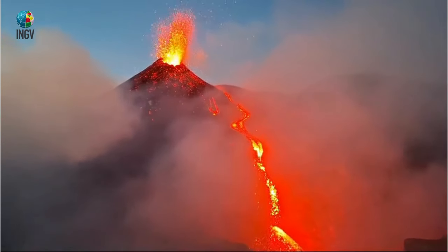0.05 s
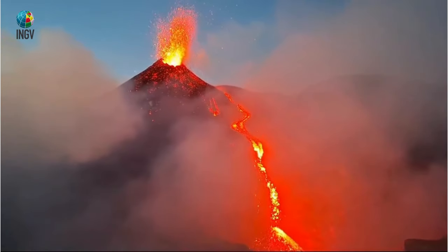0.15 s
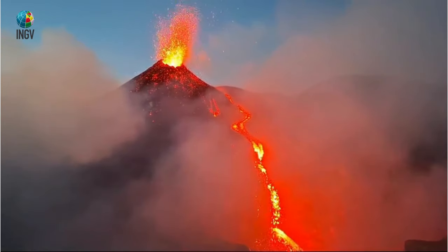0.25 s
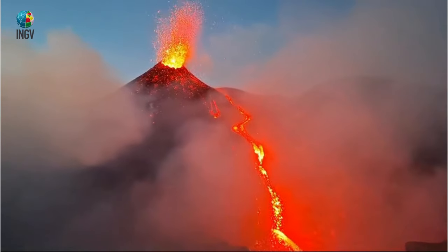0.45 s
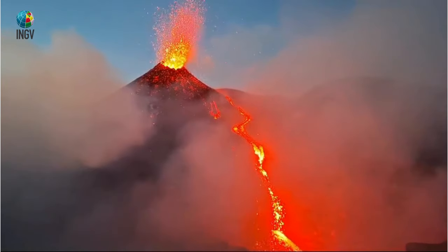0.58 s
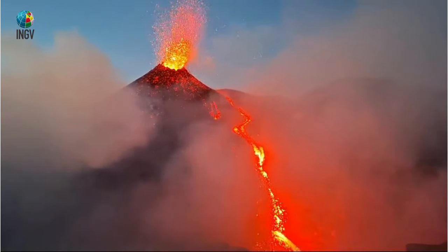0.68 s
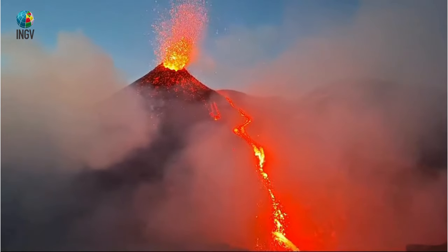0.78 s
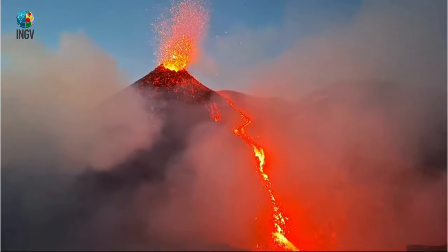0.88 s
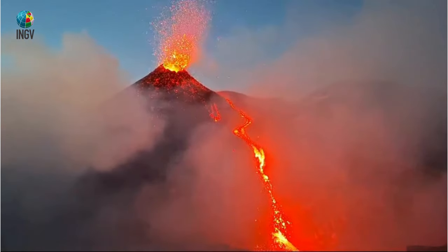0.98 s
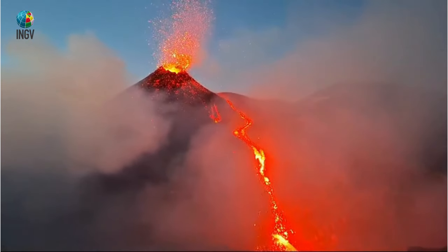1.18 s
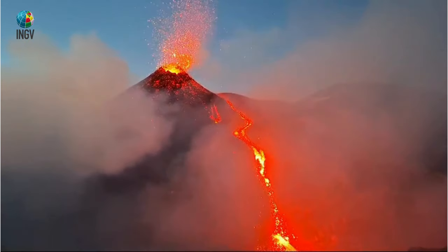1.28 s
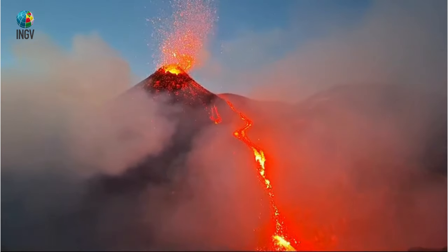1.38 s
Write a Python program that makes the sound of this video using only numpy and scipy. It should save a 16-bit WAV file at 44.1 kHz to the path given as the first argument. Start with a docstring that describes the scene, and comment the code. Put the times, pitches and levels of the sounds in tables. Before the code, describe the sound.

A short erupting volcano's roar surges with dull booms, then dies away under gusting wind.

```python
"""Distant volcano: a lava fountain surges. A gas jet roars up quickly and dies away, with
dull claps, spurts of hiss and the vent's hollow note, over low booms of bursting gas bubbles.
Wind buffets the right microphone port and shakes something loose that knocks softly near the left.
A faint high sizzle passes in sprays while the roar fades."""
import sys
import numpy as np
from scipy import signal
from scipy.fft import rfft, irfft
from scipy.io import wavfile
from scipy.ndimage import uniform_filter1d

SR = 44100
rng = np.random.default_rng(int(sys.argv[2]) if len(sys.argv) > 2 else 0)


def wrap_up_sound(samples):
    """Save the sound to the file named by the first command line argument, as 16-bit audio."""
    columns = np.atleast_2d(samples).T
    # keep every value between -1 and 1, then stretch to whole-number steps
    tamed = np.clip(columns, -1, 1)
    steps = np.round(tamed * 32767).astype(np.int16)
    wavfile.write(sys.argv[1], SR, steps)


N = 63945

# wind at the ports (time [s], left [dB], right [dB])
BUFFETING = [(0, -41.5, -29), (.12, -58, -38.5), (.3, -57.5, -30), (0.599, -36, -28.5), (.77, -43, -36),
             (.95, -38.5, -32.5), (1.06, -56.5, -41), (1.142, -40, -34), (1.25, -74, -35.5),
             (1.45, -41.5, -35.5)]
# wind spectra (frequency [Hz], density [dB])
LEFT_WIND_SPECTRUM = [(20, -15.5), (70, -4), (150, -15), (220, 5.5), (330, -9), (600, -24.5), (5000, -92.5)]
RIGHT_WIND_SPECTRUM = [(15, -24.5), (35, -6), (70, 3.5), (125, 1.5), (210, -5), (300, -14), (480, -21.5),
                       (700, -43), (2000, -35.5), (6000, -100)]
# gusts on the right port (time [s], half-width [s], level [dB], pitch [Hz])
GUSTS = [(.04, .016, -25.5, 110), (.214, .027, -25, 58), (.325, .013, -19, 195), (1.125, .02, -34, 84),
         (1.186, .02, -26, 180), (1.3, .016, -33, 200), (1.368, .028, -25, 105), (1.405, .012, -29, 230),
         (1.423, .018, -28, 90)]
# eddies in a gust (frequency [x pitch], density [dB])
EDDY_SPECTRUM = [(.2, -14), (.7, -1.5), (2.6, -5.5), (4, -26), (30, -82.5)]

# gas jet; steady roar, swollen by the surge rolling over the slopes (time [s], level [dB])
JET_LEVEL = [(0, -78), (.19, -53), (.222, -33.5), (.25, -29.5), (.283, -24), (.355, -20.5), (.395, -21.5),
             (.452, -27.5), (.53, -27.5), (.635, -30.5), (.68, -40.5), (.8, -37), (.92, -44), (1.05, -55),
             (1.45, -62)]
WASH_LEVEL = [(0, -48.5), (.2, -50.5), (.245, -29), (.3, -22.5), (.36, -35.5), (.47, -38.5), (.65, -33),
              (.72, -36), (.83, -37), (.91, -41.5), (.96, -41), (1.08, -47), (1.45, -48)]
# their spectra (frequency [Hz], density [dB])
JET_SPECTRUM = [(100, -26), (270, -14.5), (370, -1.5), (480, 0), (610, -9.5), (760, -2), (900, -14.5),
                (1080, -0.5), (1240, -7), (1420, -14), (1600, -22.5), (1760, -8), (2030, -29.5),
                (2230, -18.5), (2520, -35), (2900, -39), (3700, -40), (5000, -49), (7000, -61),
                (10000, -90)]
WASH_SPECTRUM = [(100, -14), (240, -12.5), (420, 2.5), (640, -2.5), (850, -2.5), (970, -3.5), (1250, -3),
                 (1500, -3), (1780, -5), (2030, -9.5), (2230, -12.5), (2500, -22.5), (2900, -32.5),
                 (3700, -29.5), (5000, -36), (7000, -65.5), (10000, -87)]
# jet, left to right (frequency [Hz], correlation [0..1])
JET_CORRELATION = [(200, 0.51), (400, 0.94), (1100, 1), (1800, 0.87), (3000, 0.27)]
# vent resonance (time [s], level [dB], pitch [Hz])
VENT_NOTE = [(0, -60, 450), (.29, -45, 420), (.46, -34, 375), (.51, -34, 440), (.63, -45, 420),
             (.72, -36.5, 460), (.82, -34.5, 440), (.9, -46, 420), (.955, -36.5, 445), (1.03, -48, 470),
             (1.45, -54, 430)]

# hiss and sizzle spectra (frequency [Hz], density [dB])
HISS_SPECTRUM = [(1500, -2.5), (2600, -3), (3700, -4.5), (4800, -9.5), (5800, -22.5), (8500, -28.5),
                 (13000, -25.5), (16000, -27.5)]
SIZZLE_SPECTRUM = [(4000, -22.5), (6500, -8), (8500, -17), (10500, -13.5), (12200, -6), (14000, -17.5),
                   (16000, -21.5)]
# sprays of sizzle (time [s], half-width [s], level [dB])
SPRAYS = [(0.074, 0.25, -80), (.089, 0.0027, -72), (0.376, .09, -81), (0.512, 0.046, -77),
          (0.585, 0.042, -73.5), (0.654, 0.054, -75.5), (0.753, 0.091, -78), (0.844, 0.053, -71.5),
          (0.913, 0.039, -73), (.985, 0.058, -77)]

# blows of the loose object (time [s], level [dB])
KNOCKS = [(.12, -30), (.181, -31), (1.173, -31), (1.189, -28), (1.201, -20.5), (1.248, -28.5), (1.267, -30),
          (1.29, -27), (1.302, -33), (1.339, -28), (1.374, -26.5), (1.406, -28), (1.42, -31)]
# its modes (frequency [Hz], level [dB], T60 [s])
KNOCK_MODES = [(323, -10.5, 0.026), (410.6, 1.5, 0.046), (473, 1, 0.028), (630, -5, 0.0091)]
# its contact tick (frequency [Hz], density [dB])
TICK_SPECTRUM = [(200, -6), (500, 7.5), (800, -7.5), (1400, -9), (2200, -25), (3000, -32), (5000, -49),
                 (9000, -69)]

# bubble bursts (time [s], half-width [s], level [dB], pitch [Hz], left minus right [dB])
BOOMS = [(.279, .02, -21.5, 72, -5), (.329, .023, -13.5, 76, -4), (.36, .012, -29, 150, 2),
         (.393, .024, -12, 74, 1), (.441, .022, -13.5, 68, 3), (.521, .025, -22.5, 70, 2),
         (.592, .025, -26.5, 85, -3), (.638, .02, -28, 130, 1), (.663, .026, -22.5, 60, 3),
         (.702, .018, -28, 85, 1), (.733, .022, -32, 55, 4), (.812, .024, -25, 72, 3),
         (.869, .022, -27, 115, 6)]
# their rumble (frequency [Hz], density [dB])
RUMBLE_SPECTRUM = [(15, -31), (35, 6.5), (90, -4.5), (180, 1.5), (270, -13), (500, -23.5), (1500, -71.5),
                   (5000, -110)]

# claps in the roar (time [s], half-width [s], level [dB])
CLAPS = [(.286, .008, -21.5), (.32, .014, -22), (.399, .016, -18.5), (.958, .011, -35)]
# spurts at the vent (time [s], rise [s], fall [s], level [dB])
SPURTS = [(0.299, 0.037, 0.037, -48.5), (0.618, 0.02, 0.077, -49.5)]
# their spectra (frequency [Hz], density [dB])
CLAP_SPECTRUM = [(120, 5), (300, -17.5), (470, 4.5), (700, -13), (1150, -7.5), (2000, -20.5), (2800, -36),
                 (8000, -97.5)]
SPURT_SPECTRUM = [(1200, -21.5), (2200, 6.5), (3000, -2.5), (3900, -1.5), (5000, -27.5), (7000, -43)]

TIME_S = np.arange(N) / SR
BINS_HZ = np.fft.rfftfreq(N, 1 / SR)


def amp(db):
    """Decibels to gain."""
    return 10 ** (np.asarray(db) / 20)


def unit(x):
    """Scale to rms 1."""
    return x / np.sqrt(np.mean(x ** 2) + 1e-20)


def level(points):
    """Gain along (time [s], level [dB])."""
    return amp(np.interp(TIME_S, *np.transpose(points)))


def per_bin(points):
    """Table value at each bin, on a log-frequency axis."""
    hz, value = np.transpose(points)
    return np.interp(np.log(BINS_HZ + 1), np.log(hz + 1), value)


def coloured(x, spectrum):
    """Filter by a spectrum; rms 1."""
    return unit(irfft(rfft(x) * amp(per_bin(spectrum)), N))


def pan(db):
    """Channel gains for a left-minus-right level."""
    return amp([[db / 2], [-db / 2]])


def stereo_noise(spread):
    """Common white noise plus an independent part per channel."""
    return rng.standard_normal(N) + spread * rng.standard_normal((2, N))


def flutter(rate_hz, depth_db):
    """Random gain wandering near rate_hz."""
    band = (BINS_HZ / rate_hz) / (1 + (BINS_HZ / rate_hz) ** 4)
    return amp(depth_db * unit(irfft(rfft(rng.standard_normal(N)) * band, N)))


def steady(x, samples=2205):
    """Flatten the slow swells of a noise."""
    power = uniform_filter1d(uniform_filter1d(x ** 2, samples), samples)
    return x / np.sqrt(abs(power) + 1e-12)


def swell(at_s, width_s):
    """Bell envelope, 1/e^2 at width_s from the centre."""
    return np.exp(-2 * ((TIME_S - at_s) / width_s) ** 2)


def lump(at_s, width_s, hz, start_turns, sag=0.2):
    """Pressure wave whose pitch sags through hz at at_s."""
    pitch_hz = hz * (1 - sag * np.tanh((TIME_S - at_s) / width_s))
    return np.sin(2 * np.pi * (start_turns + np.cumsum(pitch_hz) / SR))


def wind():
    """Buffeting, independent at each port; stronger on the right, where the gusts land."""
    air = rng.standard_normal((2, N)) * flutter(rate_hz=56, depth_db=1.5)
    left = level([(s, db) for s, db, _ in BUFFETING])
    left *= steady(coloured(air[0], LEFT_WIND_SPECTRUM))
    right = level([(s, db) for s, _, db in BUFFETING])
    right *= steady(coloured(air[1], RIGHT_WIND_SPECTRUM), samples=882)
    for (at_s, width_s, db, hz), start_turns in zip(GUSTS, rng.random(len(GUSTS))):
        spectrum = [(ratio * hz, eddy_db) for ratio, eddy_db in EDDY_SPECTRUM]
        eddies = steady(coloured(rng.standard_normal(N), spectrum), samples=441)
        right += amp(db) * swell(at_s, width_s) * (lump(at_s, width_s, hz, start_turns) + 0.55 * eddies)
    return np.array([left, right])


def turbulence(spectrum, correlation, depth_db, lag_s=0.00008):
    """Fluttering gas noise; reaches the right port lag_s late."""
    left, other = rfft(rng.standard_normal((2, N)) * flutter(rate_hz=72, depth_db=depth_db))
    right = correlation * left + np.sqrt(1 - correlation ** 2) * other
    right *= np.exp(-2j * np.pi * BINS_HZ * lag_s)
    return coloured(irfft(np.array([left, right]), N), spectrum)


def roar(jet_db=-1.5):
    """Throaty gas jet, surrounding wash and vent note, dulled by distance."""
    jet = level(JET_LEVEL) * turbulence(JET_SPECTRUM, per_bin(JET_CORRELATION), depth_db=1.0)
    wash = level(WASH_LEVEL) * turbulence(WASH_SPECTRUM, correlation=0.84, depth_db=1.9)
    return pan(db=0.86) * (amp(jet_db) * jet + wash + vent())


def vent(width_hz=38):
    """Narrow noise band following the vent's drifting resonance."""
    at_s, db, hz = np.transpose(VENT_NOTE)
    lowpass = 1 / (1 + 1j * np.fft.fftfreq(N, 1 / SR) / width_hz) ** 2
    noise = rng.standard_normal(N) + 1j * rng.standard_normal(N)
    drift = np.fft.ifft(np.fft.fft(noise) * lowpass)
    turns = np.cumsum(np.interp(TIME_S, at_s, hz)) / SR
    note = (drift * np.exp(2j * np.pi * turns)).real
    return amp(np.interp(TIME_S, at_s, db)) * steady(note, samples=1323)


def hiss():
    """Faint steady hiss plus sprays of grainy high sizzle."""
    floor = amp(db=-62.5) * pan(db=2.5) * coloured(rng.standard_normal((2, N)), HISS_SPECTRUM)
    grains = stereo_noise(spread=0.32) * flutter(rate_hz=110, depth_db=1.3)
    sprays = sum(amp(db) * swell(at_s, width_s) for at_s, width_s, db in SPRAYS)
    return floor + sprays * pan(db=-2) * coloured(grains, SIZZLE_SPECTRUM)


def knocks(rise_s=0.0024, tick_s=0.0029, tick_db=-9, right_db=-35):
    """Light blows: a tick and dull modes, randomly detuned per blow."""
    out = np.zeros(N)
    tick = amp(tick_db) * steady(coloured(rng.standard_normal(N), TICK_SPECTRUM), samples=130)
    for at_s, db in KNOCKS:
        age_s = np.maximum(TIME_S - at_s, 0)
        detunes = 1 + 0.04 * rng.standard_normal(len(KNOCK_MODES))
        ring = sum(amp(mode_db - 60 * age_s / t60_s) * np.sin(2 * np.pi * hz * detune * age_s)
                   for (hz, mode_db, t60_s), detune in zip(KNOCK_MODES, detunes))
        attack = 1 - np.exp(-age_s / rise_s)
        out += amp(db) * (attack * ring + swell(at_s + tick_s, tick_s) * tick)
    return np.array([out, amp(right_db) * out])


def booms():
    """Bursting gas bubbles: each a pressure lump in a puff of rumble."""
    out = np.zeros((2, N))
    rumble = steady(coloured(stereo_noise(spread=0.61), RUMBLE_SPECTRUM), samples=882)
    for (at_s, width_s, db, hz, pan_db), start_turns in zip(BOOMS, rng.random(len(BOOMS))):
        burst = 0.78 * lump(at_s, width_s, hz, start_turns) + 0.35 * rumble
        out += amp(db) * pan(pan_db) * swell(at_s, width_s) * burst
    return out


def claps():
    """Short dull noise bursts in the roar."""
    air = steady(coloured(stereo_noise(spread=0.12), CLAP_SPECTRUM), samples=330)
    return air * sum(amp(db) * swell(at_s, width_s) for at_s, width_s, db in CLAPS)


def spurts():
    """Brighter gas jets: quick rise, exponential tail."""
    envelope = np.zeros(N)
    for at_s, rise_s, fall_s, db in SPURTS:
        age_s = TIME_S - at_s
        rise = np.exp(-(age_s / rise_s) ** 2)
        fall = np.exp(-abs(age_s) / fall_s)
        envelope += amp(db) * np.where(age_s < 0, rise, fall)
    return envelope * coloured(stereo_noise(spread=0.72), SPURT_SPECTRUM)


def scene():
    """Eruption far off, wind close by."""
    return roar() + spurts() + claps() + booms() + wind() + knocks() + hiss()


def record(dry):
    """Steep low-pass band limit."""
    cutoff_hz = 15750
    lowpass = signal.firwin(511, cutoff_hz, window=("kaiser", 9), fs=SR)
    return signal.oaconvolve(dry, lowpass[None], "same")


dry = scene()
out = record(dry)
wrap_up_sound(out)
```